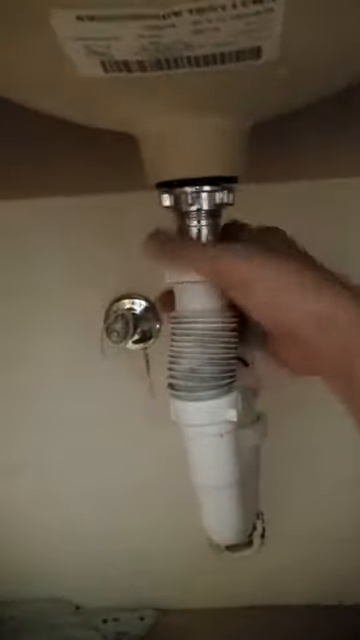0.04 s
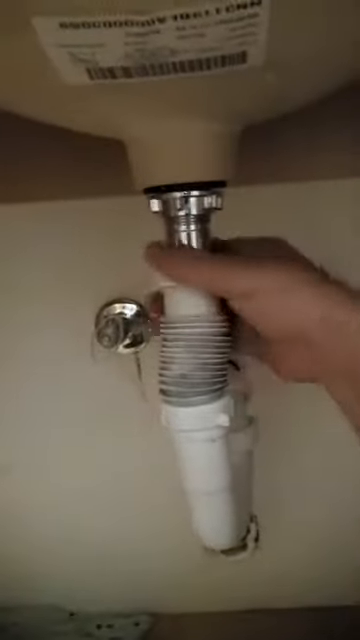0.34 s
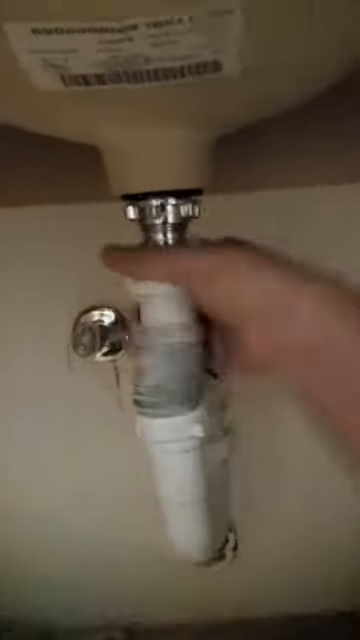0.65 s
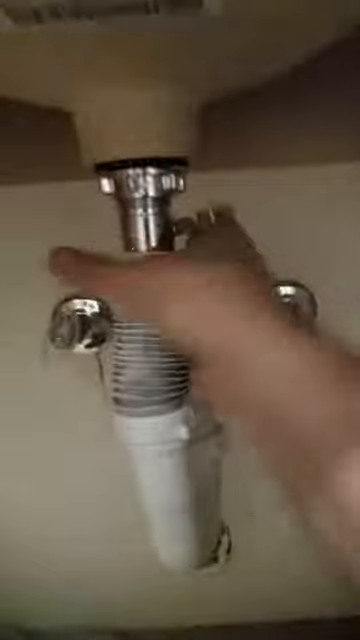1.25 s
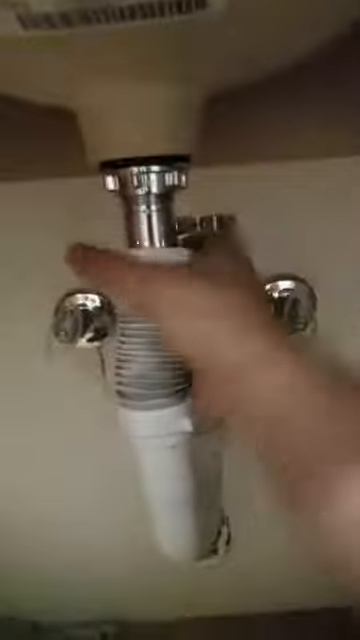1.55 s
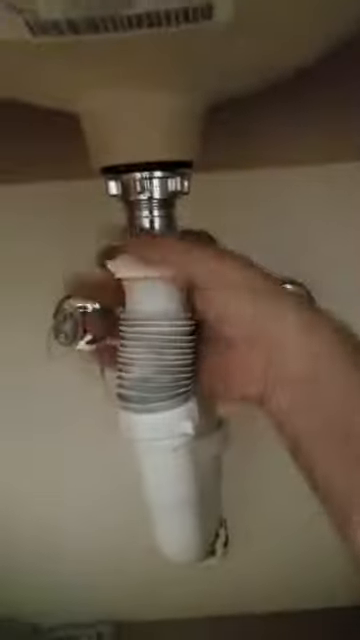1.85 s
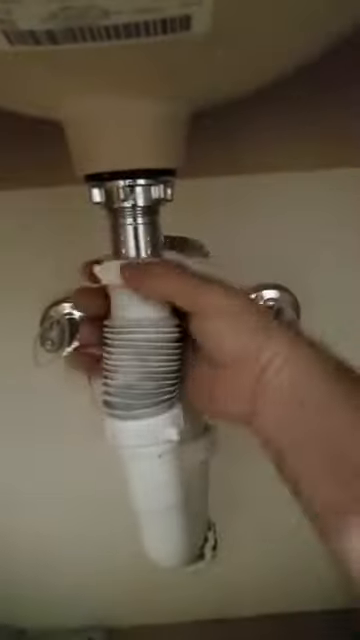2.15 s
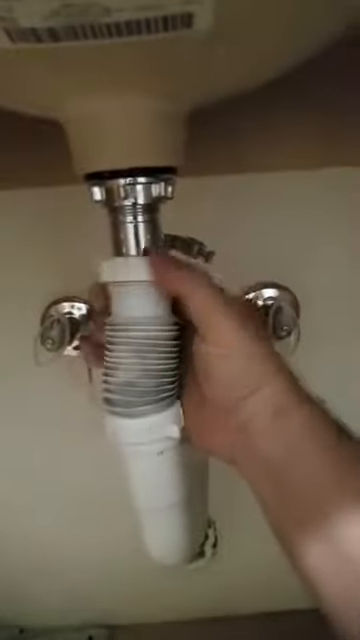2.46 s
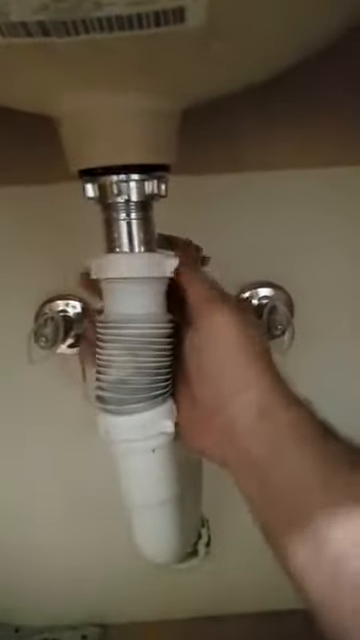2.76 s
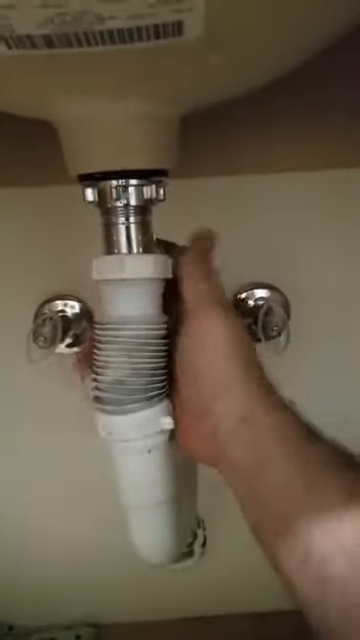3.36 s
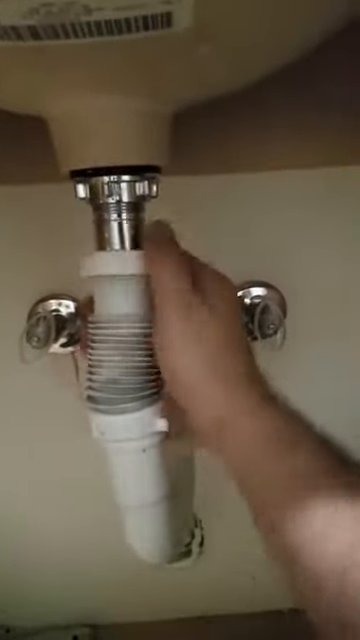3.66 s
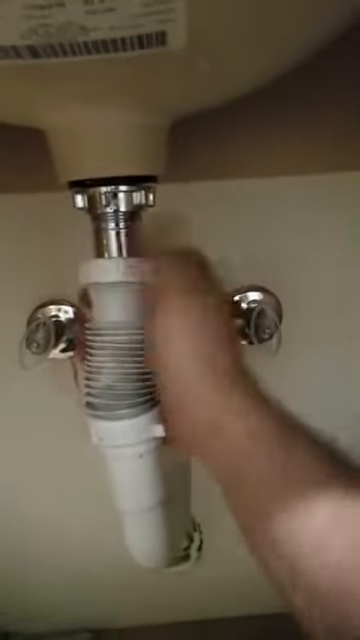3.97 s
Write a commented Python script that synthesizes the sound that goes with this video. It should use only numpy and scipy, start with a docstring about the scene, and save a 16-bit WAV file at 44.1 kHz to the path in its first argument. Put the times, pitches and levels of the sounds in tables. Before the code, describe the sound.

Close up in a sink cabinet, a hand twists a plastic pipe nut with soft rasps and rubbing. The metal stopper linkage ticks and chatters, the pipe knocks lightly, and a rod clinks last. A low hum continues underneath.

```python
"""A low, throbbing hum and the soft hiss of rubbing skin come first, in the cabinet under a bathroom sink.
A hand is spinning a plastic slip nut onto a drain pipe: the thread rasps in short strokes and the pipe
knocks. The nut taps the chrome tailpiece (the tube below the basin), and basin and cabinet get bumped.
The fingers jog the metal linkage that works the stopper, so it ticks, chatters and rings.
At the very end its rod is struck hard and clinks loudly."""
import sys
import numpy as np
from scipy import signal
from scipy.fft import rfft, irfft
from scipy.io import wavfile
from scipy.ndimage import uniform_filter1d

SR = 44100
rng = np.random.default_rng(int(sys.argv[2]) if len(sys.argv) > 2 else 0)


def generate_wav(sig):
    """Save sig (samples, or channels by samples) to the path in sys.argv[1] as 16-bit PCM at SR."""
    pcm = np.round(np.clip(np.atleast_2d(sig).T, -1, 1) * 32767).astype(np.int16)
    wavfile.write(sys.argv[1], SR, pcm)


N = 176400
TIME = np.arange(N) / SR
AGE = TIME[:SR // 3]  # seconds since a short sound began

# A spectrum sets a tone colour: f/Hz, level/dB. A mode is one tone at which an object rings.
# Modes are listed as f/Hz, level/dB, ring time/s (the time to fade by 60 dB).
# Levels in both only compare the rows with each other.

# how loud the hum is over time: t/s, level/dB
HUM_LEVELS = [(0, -35.5), (1.4, -35), (1.7, -32), (2.6, -34.5), (3.3, -30.5), (4, -35)]
# the hum's two tones: multiple of its pitch, relative level/dB
HUM_TONES = [(1, -0.82), (2.03, -16.5)]
# the hum's throbbing: rate/Hz, depth/dB
HUM_THROBS = [(12, 1.72), (5.9, 1.5)]
# the room's rumble: f/Hz, level/dB
RUMBLE_SPECTRUM = [(15, -58), (28, -1), (45, -5.5), (70, 2), (110, 1.5), (150, -5.5), (200, -24),
                   (310, -15.5), (420, -18.5), (550, -22.5), (900, -40.5), (1700, -28.5), (2400, -33.5),
                   (3200, -43.5), (5500, -47), (12000, -31)]
# how loud the rumble is over time: t/s, level/dB
RUMBLE_LEVELS = [(0, -50.5), (1.3, -49.5), (1.7, -47), (2.6, -50.5), (3.15, -45), (3.5, -49), (4, -44.5)]
# pitches that the rumble stirs up in the cabinet: f/Hz, width/Hz, relative level/dB
CABINET_RESONANCES = [(85.8, 15.8, -2), (219, 43, -21.5), (308.8, 26.6, -10.5), (352, 37, -21.5),
                      (533.5, 2.3, -19), (643.7, 7.5, -23.5)]
# echoes from the cabinet walls: delay/s, relative level/dB
WALL_ECHOES = [(.0013, -25.5), (.0023, -25), (.0037, -16), (.0054, -17.5), (.0081, -23), (0.0124, -14)]

# the arm thuds against the cabinet: t/s, level/dB
ARM_THUDS = [(1.66, -37), (3.145, -28.5), (3.835, -58)]
# the cabinet panel: f/Hz, level/dB, ring time/s
PANEL_MODES = [(86, 4, .2), (99.7, 23, 0.76), (150, 9, 0.27), (167, -26, 0.27), (213, -20, .12)]
# the basin is bumped through the drain: t/s, level/dB
BASIN_BUMPS = [(1.62, -44.5), (1.674, -40), (1.907, -48), (3.09, -42), (3.71, -43), (3.828, -31),
               (3.853, -30), (3.964, -38.5)]
# the basin: f/Hz, level/dB, ring time/s
BASIN_MODES = [(157.5, -2.5, 0.12), (268, 0, 0.11), (307, 0.5, 0.13), (387, -18.5, 0.039), (536, -12, 0.11),
               (802, -27, 0.093)]
# the nut taps the tailpiece: t/s, level/dB
NUT_TAPS = [(.438, -39.5), (.512, -58), (.692, -50.5), (.706, -50), (.958, -50), (1.060, -45), (1.259, -48),
            (1.620, -38), (1.708, -58), (1.906, -37.5), (2.214, -52), (2.50, -57), (2.782, -50.5),
            (3.731, -40), (3.842, -43)]
# the chrome tailpiece: f/Hz, level/dB, ring time/s
TAILPIECE_MODES = [(3030, -15, 0.017), (4030, -11.5, 0.035), (4230, 6, 0.053), (4650, 0, .018),
                   (6300, -3, 0.029), (7600, 6, 0.048), (7620, 7.5, 0.046), (8800, 13, 0.023)]

# the pipe knocks: t/s, level/dB, fade/s, boosted f/Hz, relative snap level/dB
PIPE_KNOCKS = [(0.435, -58, .0095, 604, -4), (.503, -49.5, 0.026, 920, -8), (.789, -49, 0.0079, 1660, 7),
               (0.957, -48, 0.013, 840, 1), (1.052, -45.5, 0.017, 1110, -2), (1.063, -56, 0.0072, 3150, -2),
               (1.421, -46.5, .03, 1140, -12), (1.619, -43.5, 0.015, 1580, 6),
               (1.634, -44.5, 0.032, 503, -9), (1.671, -37, 0.018, 560, -3.5),
               (1.791, -48.5, 0.0047, 1580, -1), (1.904, -43, 0.014, 1600, 0),
               (1.990, -44.5, .018, 680, -15), (2.121, -47, .0058, 400, -12),
               (2.777, -47, 0.016, 1450, -4.5), (2.971, -42, 0.0087, 1160, -1.5),
               (2.98, -49, .009, 1130, -7), (3.078, -42.5, .016, 450, -8), (3.142, -50, 0.0034, 1640, -1),
               (3.182, -45.5, .007, 527, -1), (3.824, -35, 0.01, 350, -7), (3.827, -37.5, 0.029, 2130, 4),
               (3.842, -37.5, 0.012, 250, -16), (3.852, -46, 0.02, 2030, 4)]
# the hollow plastic pipe: f/Hz, level/dB
PIPE_SPECTRUM = [(90, 8), (220, -1.5), (330, 3), (700, -2), (1050, -12.5), (1700, -8), (2300, -12.5),
                 (3200, -12), (4300, -15.5), (6200, -22), (10000, -11)]
# the snap that starts a knock: f/Hz, level/dB
SNAP_SPECTRUM = [(150, -5), (500, -3.5), (1000, -2), (2300, 1.5), (4300, -4), (6000, -7.5), (10000, -1)]
# fingers brush the pipe: t/s, level/dB, length/s, boosted f/Hz
FINGER_SCUFFS = [(0.055, -53.5, 0.012, 850), (0.192, -58, 0.069, 1690), (0.292, -68, 0.032, 1480),
                 (0.592, -56, 0.0094, 600), (.635, -53.5, 0.021, 774), (0.669, -60, 0.013, 650),
                 (.73, -56, 0.032, 704), (1.264, -45.5, 0.061, 2200), (1.459, -58, 0.0076, 885),
                 (1.80, -45.5, 0.027, 454), (1.93, -54, 0.079, 1670), (2.213, -53.5, 0.02, 1400),
                 (2.28, -51.5, 0.021, 550), (2.382, -52, 0.021, 1200), (2.624, -50.5, 0.027, 500),
                 (2.838, -48, 0.015, 500), (2.899, -55, .022, 2380), (3.648, -45.5, 0.014, 554),
                 (3.701, -44, .035, 550)]

# the nut runs round: start/s, end/s, level/dB
NUT_SPINS = [(0.248, 0.356, -60), (0.824, 0.909, -51.5), (1.259, 1.343, -53.5), (1.617, 1.71, -60),
             (1.98, 2.043, -55.5), (2.807, 2.90, -72)]
# the hollow rasp of the sliding nut: f/Hz, level/dB
SLIDE_SPECTRUM = [(900, -26), (1600, -4.5), (2250, 5.5), (2900, 2), (3500, 5), (4600, -14), (6000, -21)]
# pitches at which the nut rings: f/Hz, width/Hz, relative level/dB
NUT_RESONANCES = [(2380, 260, -10), (2680, 82, 0.5), (3100, 110, -12), (4100, 500, -9), (4840, 820, -11.5)]
# strokes of the hand: start/s, end/s, skin level/dB, thread level/dB
HAND_STROKES = [(-0.005, 0.28, -63.5, -74), (0.271, 0.384, -51.5, -59.5), (0.42, 0.72, -57.5, -62.5),
                (0.776, 0.825, -46, -48.5), (0.83, 0.908, -49, -56.5), (0.95, 1.084, -53, -62.5),
                (1.097, 1.153, -59.5, -80), (1.232, 1.345, -45, -58.5), (1.403, 1.61, -53, -80),
                (1.585, 1.695, -45.5, -48), (1.703, 1.727, -51, -70), (1.766, 1.851, -52.5, -56),
                (1.915, 2.028, -48, -53), (2.037, 2.09, -51.5, -62.5), (2.16, 2.221, -56.5, -64),
                (2.257, 2.406, -51.5, -56), (2.473, 2.524, -59, -58.5), (2.524, 2.66, -52.5, -58),
                (2.772, 2.834, -61, -58.5), (2.826, 2.928, -48.5, -52.5), (3.001, 3.176, -49.5, -56.5),
                (3.206, 3.366, -55, -64), (3.493, 3.543, -46.5, -51), (3.466, 3.496, -60, -59.5),
                (3.544, 3.65, -57, -56.5), (3.637, 3.745, -45.5, -51), (3.756, 3.824, -61, -57)]
# hissing skin, rasping thread and crackling grit, each: f/Hz, level/dB
SKIN_SPECTRUM = [(3000, -24.5), (6000, -18), (7500, -15.5), (9000, -5.5), (10500, -5), (11800, 3),
                 (13000, -4.5), (14200, -8)]
THREAD_SPECTRUM = [(120, 15), (330, 15), (600, 6.5), (900, -1.5), (1400, 2), (2400, 2), (3300, -1),
                   (4400, -2), (6000, -14.5), (9000, -5.5)]
GRIT_SPECTRUM = [(400, -16), (1500, 5.5), (2500, 10), (3400, -11), (4500, -2), (6000, -10), (9000, -6),
                 (12000, 4)]

# the linkage is jogged: t/s, level/dB, chatter length/s, boosted f/Hz, relative ring level/dB
LINKAGE_TICKS = [(0.338, -26.5, 0.0037, 11470, -16), (0.348, -30, 0.0055, 11900, -25),
                 (.436, -26, 0.013, 13500, -13), (0.5, -39.5, .008, 12900, -12),
                 (.514, -35, 0.012, 13100, -9), (0.699, -42.5, 0.014, 11400, -15),
                 (0.836, -15, 0.0084, 11850, -16), (0.848, -24.5, 0.0033, 11500, -22),
                 (0.871, -32.5, 0.012, 11900, -14), (0.954, -38.5, 0.035, 11600, -13),
                 (0.976, -31.5, 0.013, 11770, -27), (.995, -40, 0.016, 11800, -18),
                 (1.058, -32, 0.01, 11200, -13), (1.254, -44, 0.0095, 11800, -15),
                 (1.32, -29.5, 0.0037, 11900, -7), (1.334, -37, .016, 11800, -10),
                 (1.421, -44, 0.019, 11200, -10), (1.598, -38.5, 0.013, 11900, -16),
                 (1.616, -21, 0.0066, 11150, -24), (1.626, -24, 0.0045, 13300, -3),
                 (1.706, -34, 0.013, 11860, -12), (1.79, -45, 0.0056, 10700, -12),
                 (1.907, -30, 0.0048, 11750, -5), (1.988, -16.5, 0.0088, 12200, -23),
                 (2.001, -22.5, 0.0026, 11900, -18), (2.020, -35, 0.019, 11900, -5),
                 (2.212, -44.5, 0.007, 11100, -16), (2.780, -41.5, 0.0074, 11150, -2),
                 (2.850, -41, 0.011, 11700, -12), (2.866, -28.5, .003, 12000, -23),
                 (2.97, -44, 0.0036, 9900, -23), (3.703, -41, .022, 11600, 0),
                 (3.725, -26, 0.015, 11100, 11), (3.826, -14.5, 0.0085, 11400, 5.5),
                 (3.849, -23.5, 0.012, 12000, -5)]
# metal chattering on metal: f/Hz, level/dB
CHATTER_SPECTRUM = [(2000, -25.5), (4200, -26), (5500, -39.5), (7800, -21), (9200, -17.5), (10200, -3.5),
                    (11000, -3.5), (11400, 0.5), (12650, 3), (13100, -11), (14100, -0.5), (14800, -27)]
# the linkage when no hand holds it: f/Hz, level/dB, ring time/s
LINKAGE_MODES = [(7682, -10.5, .24), (10100, -13, 0.28), (10550, -22, 0.23), (11320, 2.5, 0.15),
                 (11590, -2, 0.11), (11750, -1, 0.19), (11920, 2, 0.11), (12400, -5, .14), (12500, 3, 0.11),
                 (13900, 7, 0.04)]
# the rod: f/Hz, level/dB, ring time/s
ROD_MODES = [(728, -17, 0.18), (2000, -1.5, 0.13), (3050, -7, 0.037), (4190, -28.5, 0.4),
             (6250, -14, 0.093), (7740, -13, 0.27), (8660, -2, 0.066), (9300, -25, .09), (10500, -9, .2),
             (12410, -23, .2), (13250, -8, 0.27), (13250, -5, 0.28), (14000, 4, 0.086)]
# the rod's clack and its rebound, each: f/Hz, level/dB
CLACK_SPECTRUM = [(200, -11), (750, -9.5), (1200, -17), (2000, -7), (3100, 6.5), (3800, -24.5), (5200, -52),
                  (6400, -13), (9000, -2.5), (10200, 5.5), (11500, -20), (14000, -4.5)]
REBOUND_SPECTRUM = [(1000, -18.5), (2500, -13), (5200, -46), (6400, -14), (7500, -17.5), (8700, -11),
                    (10200, -3), (12000, 5.5), (13100, 11), (14200, -10)]


def from_db(db):
    """Turn decibels into a factor to multiply by."""
    return 10 ** (np.asarray(db) / 20)


def rms_one(x):
    """Scale a sound so that its average strength (rms) is 1."""
    return x / np.sqrt(np.mean(x ** 2) + 1e-20)


def burst_one(x):
    """Scale a burst so that its loudest 8 milliseconds have strength 1."""
    return x / np.sqrt(uniform_filter1d(x * x, 350).max() + 1e-20)


def add(out, start, x):
    """Mix x into out from a start time in seconds."""
    i = int(np.clip(start * SR, 0, N - 1))
    out[i:i + len(x)] += x[:N - i]


def colour(x, spectrum, peak_hz=1, peak_db=0, width_hz=256):
    """Give a sound the tone colour of a spectrum, with an optional boost around one pitch."""
    n = len(x) // 2 * 2
    hz = np.arange(n // 2 + 1) * SR / n
    points_hz, points_db = np.transpose(spectrum)
    db = np.interp(np.log(hz + 1), np.log(points_hz), points_db)
    db += peak_db * np.exp(-.5 * ((hz - peak_hz) / width_hz) ** 2)
    # a minimum-phase filter: its response follows a hit instead of coming before it
    cepstrum = irfft(np.log(from_db(db)))[:n // 2]
    cepstrum[0] /= 2
    return irfft(rfft(x, n) * np.exp(rfft(2 * cepstrum, n)))


def drift(rate_hz):
    """A smooth random wobble with a typical size of 1."""
    step, warm_up = 40, 2000
    pole = np.exp(-2 * np.pi * step * rate_hz / SR)
    noise = rng.standard_normal(N // step + warm_up + 2)
    slow = signal.lfilter([1], [1, -2 * pole, pole * pole], noise)[warm_up:]
    return np.interp(np.arange(N) / step, np.arange(len(slow)), rms_one(slow))


def grains(n, per_s=5000, spread_db=1):
    """Friction as a crowd of tiny clicks of uneven size, n samples long."""
    sizes = from_db(spread_db * np.minimum(rng.exponential(1, n), 5))
    signs = rng.choice([-1, 1], n)
    return sizes * signs * (rng.random(n) < per_s / SR)


def envelope(t, rise, hold, fall):
    """Loudness rises, stays up until the time hold, then dies away; all in seconds."""
    return np.clip(t / rise, 0, 1) * np.exp(-np.maximum(t - hold, 0) / fall)


def grain_burst(rise, hold, fall):
    """A short puff of friction clicks."""
    return grains(len(AGE)) * envelope(AGE, rise, hold, fall)


def resonate(x, hz, width_hz):
    """Make a sound ring around one pitch, at strength 1."""
    radius = np.exp(-np.pi * width_hz / SR)
    feedback = [1, -2 * radius * np.cos(2 * np.pi * hz / SR), radius * radius]
    return rms_one(signal.lfilter([1, 0, -1], feedback, x))


def ring(modes, spread_db=1, ring_share=1, detune=0, split_hz=0):
    """One blow on an object: each mode starts at a slightly random strength and fades."""
    out = 0
    for hz, db, ring_time in modes:
        size, shift, twin = rng.normal(size=3)
        phase = 2 * np.pi * (hz * (1 + detune * shift) * AGE + rng.random())
        beat = 2 * np.pi * (split_hz * twin * AGE + rng.random())
        tone = np.sin(phase)
        if split_hz > 0:  # a close twin makes the tone waver
            tone += .5 * np.sin(phase + beat)
        out += from_db(db + spread_db * size - 60 * AGE / (ring_share * ring_time)) * tone
    return burst_one(out)


def blows(hits, modes, rise, spread_db=1, detune=0):
    """An object rings anew after each hit in a list."""
    out = np.zeros(N)
    for start, db in hits:
        add(out, start, from_db(db) * ring(modes, spread_db, detune=detune) * np.minimum(AGE / rise, 1))
    return out


def room_rumble():
    """The room rumbles faintly, and the hollow cabinet brings out a few pitches."""
    rumble = rms_one(colour(rng.standard_normal(N), RUMBLE_SPECTRUM))
    hollow = sum(from_db(db) * resonate(rng.standard_normal(N), hz, width)
                 for hz, width, db in CABINET_RESONANCES)
    return (rumble + hollow) * from_db(np.interp(TIME, *np.transpose(RUMBLE_LEVELS)))


def hum(pitch_hz=59.3, waver_db=.6, waver_rad=.13):
    """Two low tones throb together, and each wavers a little in loudness and pitch."""
    throb_db = sum(depth * np.sin(2 * np.pi * (hz * TIME + rng.random())) for hz, depth in HUM_THROBS)
    tones = 0
    for multiple, db in HUM_TONES:
        strength = from_db(db + throb_db + waver_db * drift(7.2))
        phase = 2 * np.pi * pitch_hz * TIME + multiple * waver_rad * drift(11)
        tones += strength * np.sin(multiple * phase)
    return np.sqrt(2) * tones * from_db(np.interp(TIME, *np.transpose(HUM_LEVELS)))


def cabinet_echoes(x):
    """Close walls send back a few quick echoes; the overall power stays about the same."""
    out = x.copy()
    for delay, db in WALL_ECHOES:
        add(out, delay, from_db(db) * x)
    return out / np.sqrt(1 + sum(from_db(db) ** 2 for _, db in WALL_ECHOES))


def taps_and_bumps():
    """The tailpiece pings, the basin rings low and the cabinet panel booms when they are hit."""
    # each tap lands on another spot, so its tones vary more
    taps = blows(NUT_TAPS, TAILPIECE_MODES, rise=.00074, spread_db=3, detune=.008)
    bumps = blows(BASIN_BUMPS, BASIN_MODES, rise=.00077)
    thuds = blows(ARM_THUDS, PANEL_MODES, rise=.0026)
    return taps + bumps + thuds


def pipe_knocks():
    """The loose plastic pipe snaps at first contact and rattles briefly."""
    out = np.zeros(N)
    click = 1. * (AGE == 0)
    for start, db, fall, hz, snap_db in PIPE_KNOCKS:
        contacts = grain_burst(rise=.00059, hold=.0062, fall=fall)
        rattle = burst_one(colour(contacts, PIPE_SPECTRUM, hz, peak_db=11))
        snap = burst_one(colour(click, SNAP_SPECTRUM, hz, peak_db=11))
        add(out, start, from_db(db) * (rattle + from_db(snap_db) * snap))
    return out


def finger_scuffs():
    """Fingers brush the pipe, each time with a hollow pitch of its own."""
    out = np.zeros(N)
    for start, db, length, hz in FINGER_SCUFFS:
        brush = grain_burst(rise=.0036, hold=length, fall=.011)
        add(out, start, from_db(db) * burst_one(colour(brush, PIPE_SPECTRUM, hz, peak_db=10)))
    return out


def thread_catches(per_s=160, spread_db=2):
    """The thread sticks and slips: single jerks of uneven size at uneven times."""
    gap_draws, size_draws = rng.random((2000, 2)).T
    at = (np.cumsum(.25 + 1.5 * gap_draws) * SR / per_s).astype(int)
    sizes = from_db(spread_db * np.minimum(-np.log(1 - size_draws), 3))
    out = np.zeros(N)
    out[at[at < N]] = sizes[at < N]
    return out


def spinning_nut(slide_db=-2.5, ring_db=-4.5, slip_spread_db=1.5):
    """The loose nut slides round with a hollow rasp, and each catch of the thread makes it ring."""
    push = sum(from_db(db) * envelope(TIME - start, rise=.023, hold=end - start, fall=.017)
               for start, end, db in NUT_SPINS)
    slips = grains(N) * from_db(slip_spread_db * drift(120))
    slide = rms_one(colour(slips, SLIDE_SPECTRUM))
    jerks = thread_catches()
    ringing = sum(from_db(db) * resonate(jerks * rng.standard_normal(N) + 1e-18, hz, width)
                  for hz, width, db in NUT_RESONANCES)
    return push * (from_db(slide_db) * slide + from_db(ring_db) * rms_one(ringing))


def hand_strokes(swell_db=5, rasp_db=-2, grit_db=-6.5, grit_per_s=110):
    """With each stroke, skin hisses on the nut while the thread rasps and its grit crackles."""
    skin_power, thread_power = 0, 0
    rise, fall = .015, .038
    for start, end, skin_db, thread_db in HAND_STROKES:
        progress = np.clip((TIME - start) / (end - start + fall), 0, 1)
        swell = from_db(swell_db * (np.sin(np.pi * progress) - 2 / np.pi))  # strongest mid-stroke
        push = envelope(TIME - start, rise, end - start, fall) * swell
        skin_power += (push * from_db(skin_db)) ** 2
        thread_power += (push * from_db(thread_db)) ** 2
    grip = from_db(3.9 * drift(16))
    hiss = rms_one(colour(grains(N), SKIN_SPECTRUM)) * grip
    rasp = rms_one(colour(grains(N), THREAD_SPECTRUM)) * from_db(rasp_db + 3 * drift(23))
    grit = rng.standard_normal(N) * (rng.random(N) < grit_per_s / SR)
    crackle = from_db(grit_db) * rms_one(colour(grit, GRIT_SPECTRUM))
    return np.sqrt(skin_power) * hiss + np.sqrt(thread_power) * (rasp + crackle)


def linkage_ticks(let_go_s=3.8, held_share=.46, tail_db=-12.5):
    """Metal chatters on metal and rings on; the hand shortens the ringing until it lets go."""
    out = np.zeros(N)
    for start, db, length, hz, ring_db in LINKAGE_TICKS:
        tick = envelope(AGE, rise=.001, hold=length, fall=.002)
        tail = from_db(tail_db) * envelope(AGE, rise=.001, hold=length, fall=.008)
        contacts = grains(len(AGE)) * (tick + tail)
        chatter = burst_one(colour(contacts, CHATTER_SPECTRUM, hz, peak_db=11.5, width_hz=650))
        share = held_share if start < let_go_s else 1
        ringing = ring(LINKAGE_MODES, spread_db=2.5, ring_share=share, split_hz=30)
        ringing *= np.minimum(AGE / length, 1)  # builds up during the chatter
        add(out, start, from_db(db) * (chatter + from_db(ring_db) * ringing))
    return out


def rod_clink(start=3.9625, rebound_delay=.008):
    """The rod is struck hard: it clacks, bounces back with a bright rattle and rings."""
    strike = grain_burst(rise=.0022, hold=.0017, fall=.007)
    clack = burst_one(colour(strike, CLACK_SPECTRUM))
    bounce = grain_burst(rise=.0016, hold=.021, fall=.012)
    rebound = burst_one(colour(bounce, REBOUND_SPECTRUM))
    ringing = ring(ROD_MODES) * np.minimum(AGE / .0029, 1)
    out = np.zeros(N)
    add(out, start, from_db(-19) * clack + from_db(-17) * ringing)
    add(out, start + rebound_delay, from_db(-16.5) * rebound)
    return out


def scene():
    """The handwork echoes in the cabinet; the clink, hum and rumble join it in one channel."""
    handwork = hand_strokes() + spinning_nut() + finger_scuffs()
    hits = linkage_ticks() + pipe_knocks() + taps_and_bumps()
    return (cabinet_echoes(handwork + hits) + rod_clink() + hum() + room_rumble())[None]


def record(dry):
    """The highest treble, above 14400 Hz, is cut off steeply."""
    return signal.sosfilt(signal.ellip(10, .3, 70, 14400, fs=SR, output="sos"), dry)


dry = scene()
out = record(dry)
generate_wav(out)
```